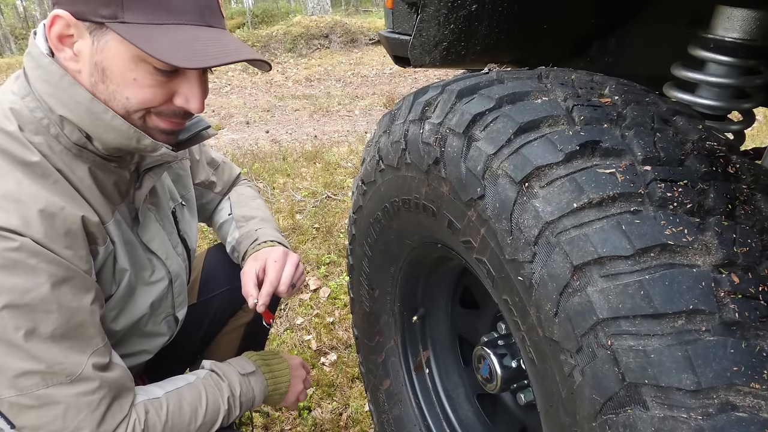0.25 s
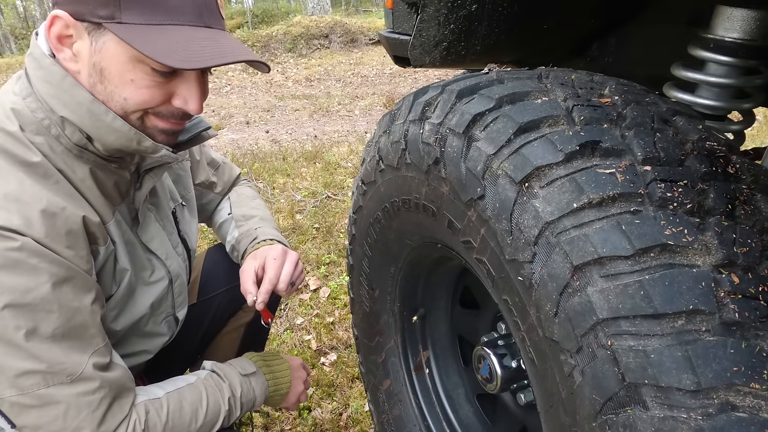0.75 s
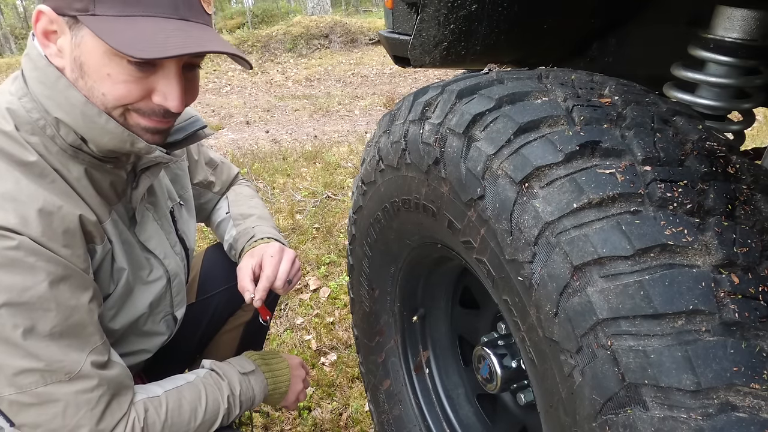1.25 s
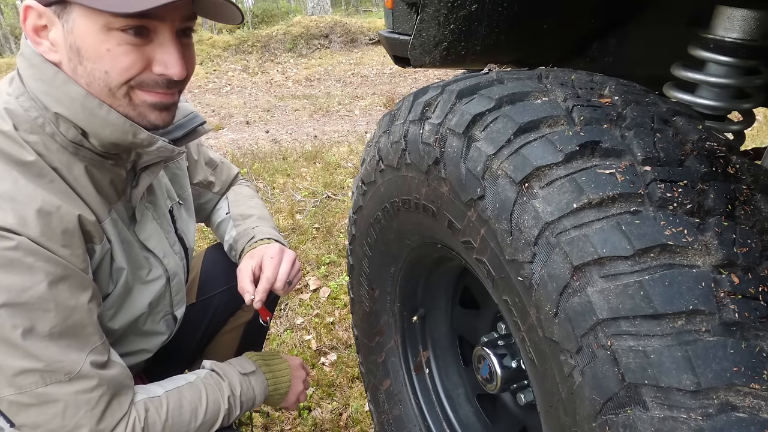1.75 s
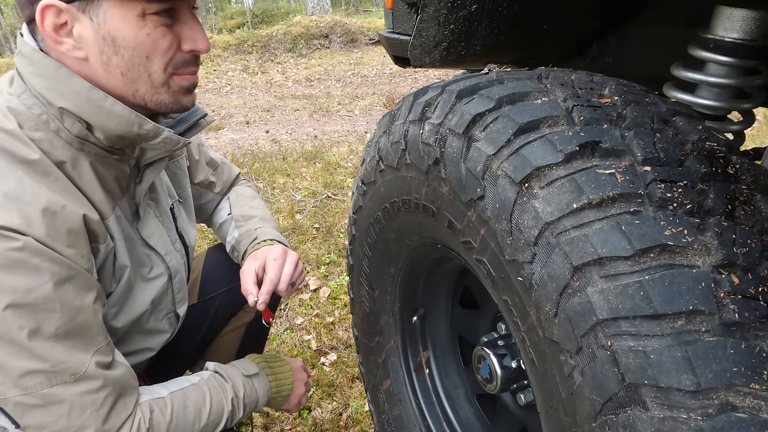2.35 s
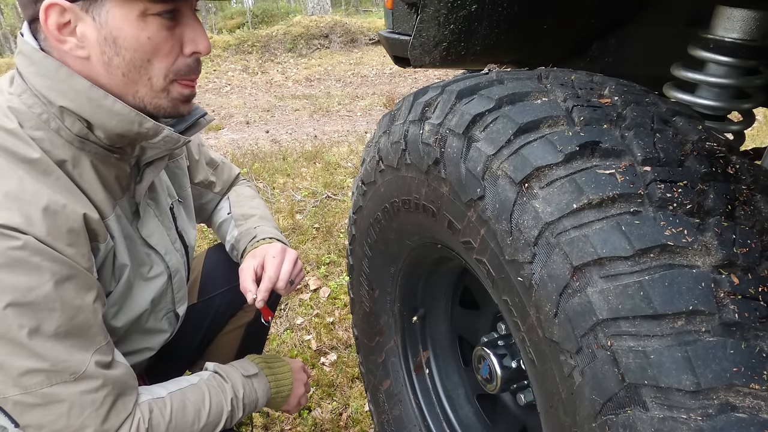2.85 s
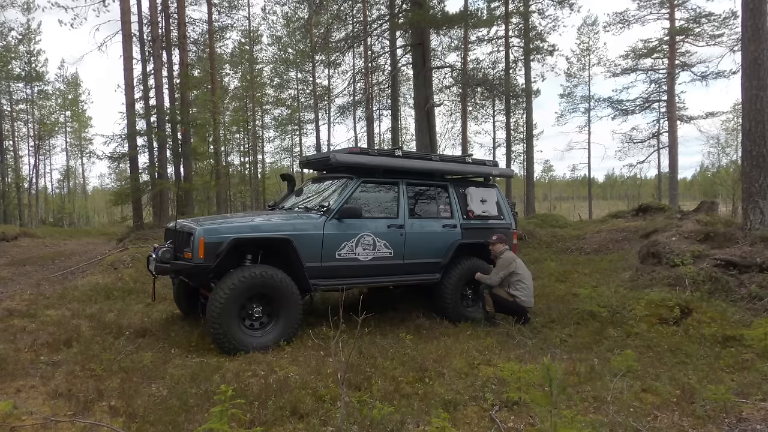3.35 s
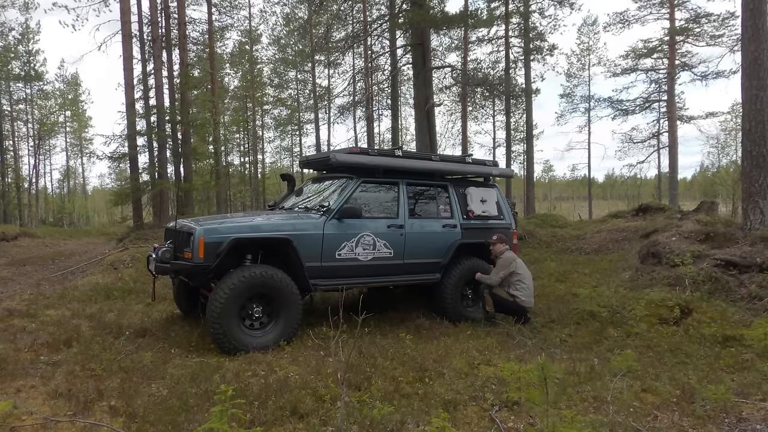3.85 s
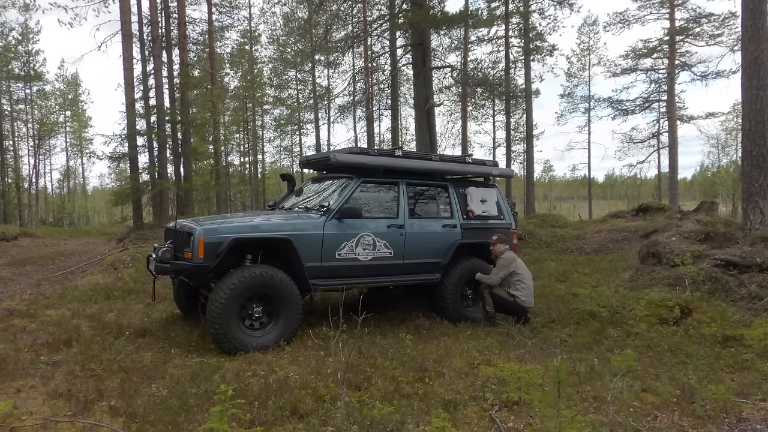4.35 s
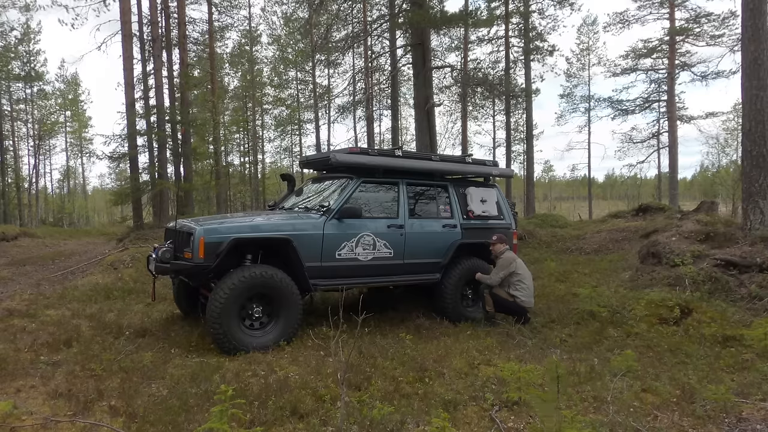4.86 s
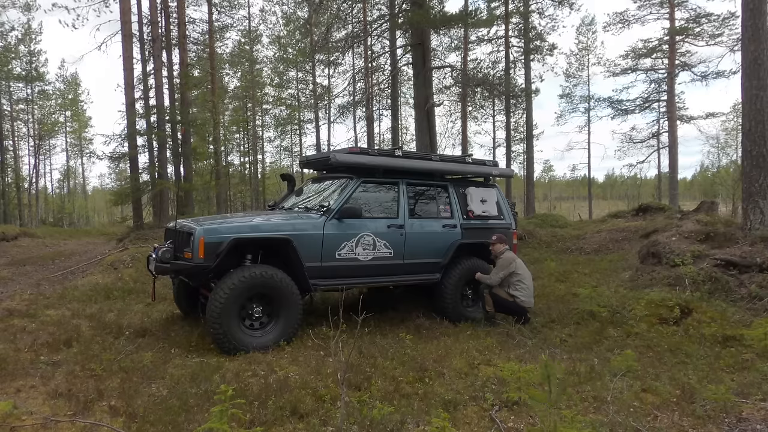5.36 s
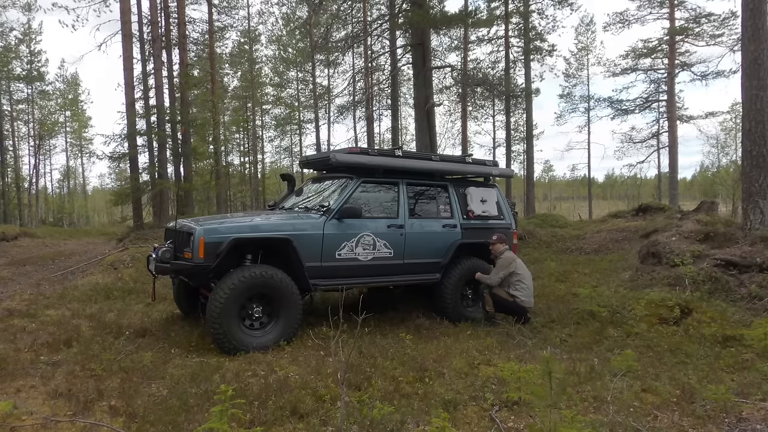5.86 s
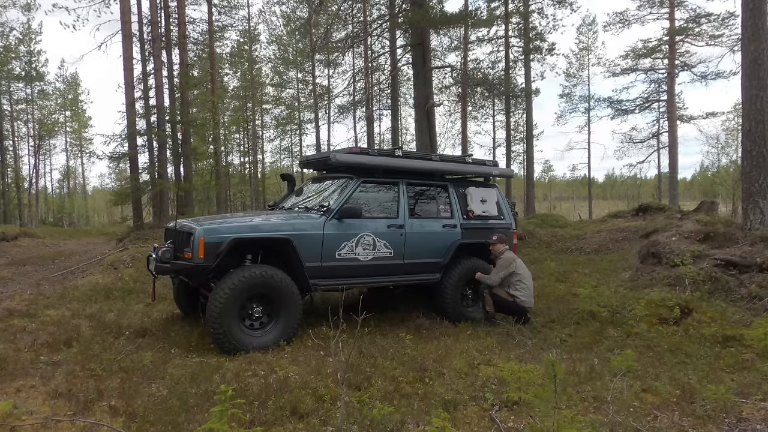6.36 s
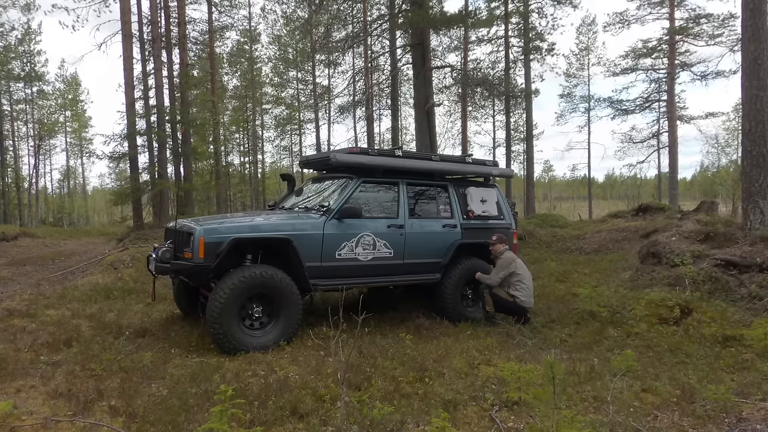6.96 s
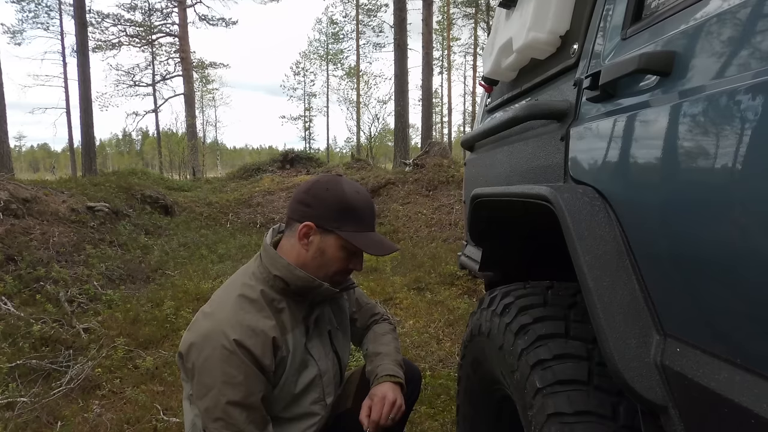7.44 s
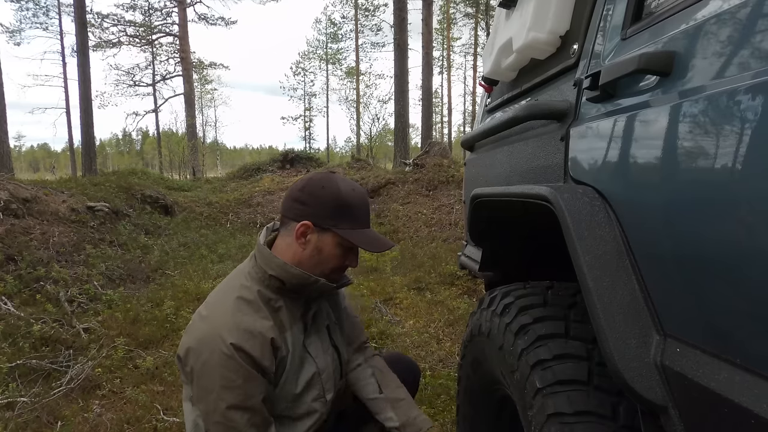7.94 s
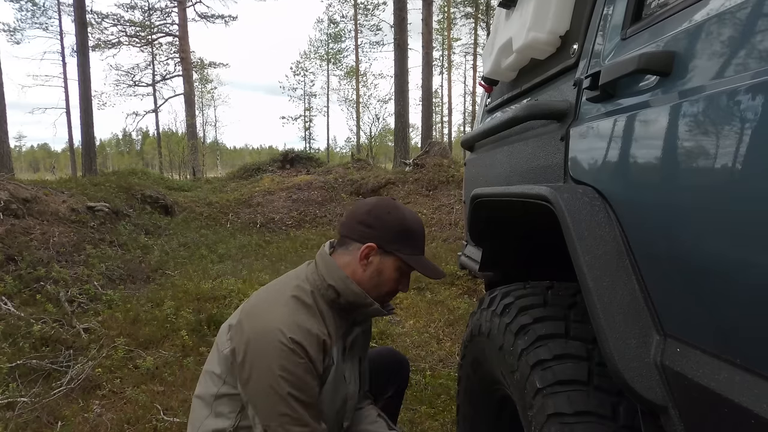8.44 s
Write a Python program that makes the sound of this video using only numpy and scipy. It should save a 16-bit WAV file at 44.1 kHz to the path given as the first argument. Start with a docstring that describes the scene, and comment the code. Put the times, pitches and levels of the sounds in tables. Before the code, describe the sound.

Outdoor, nearly mono sound of a tyre being let down. A crisp unbroken hiss runs throughout, changing colour at two cuts. It is fairly clean at first, then joined by fluttering, rumbling wind against the microphone that slowly eases before coming back stronger. In the last moments the air jet is partly blocked by a hand, and a rushing swish rises in pitch and loudness.

```python
"""Air hisses out of a car tyre's open valve in a forest clearing: noise shaped by resonances and echoes,
heard in turn by the wheel, across the clearing and beside the car. At the end a hand moves into the jet:
a noise band with climbing edges swells into a swish. Wind buffets the microphone, hard at the last two
places, as two bands of noise that shift in pitch and level with its strength. Trees add a faint rush."""
import sys
import numpy as np
from scipy import signal
from scipy.fft import rfft, irfft, next_fast_len
from scipy.io import wavfile
from scipy.ndimage import uniform_filter1d, map_coordinates

SR = 44100
rng = np.random.default_rng(int(sys.argv[2]) if len(sys.argv) > 2 else 0)


def log_audio(samples):
    """Write samples as a 16-bit WAV file to the path given in sys.argv[1]."""
    # one column per channel
    frames = np.atleast_2d(samples).T
    # limit to full scale, then quantise
    limited = np.clip(frames, -1, 1)
    pcm = np.round(limited * 32767).astype(np.int16)
    wavfile.write(sys.argv[1], SR, pcm)


N = 383669
TIME = np.arange(N) / SR
TOP_HZ = 15760
# crossfades between places: start_s, end_s
TO_FAR, TO_SIDE = (2.915, 3.12), (7.17, 7.28)


def amp(db):
    """Decibels to gain."""
    return 10 ** (np.asarray(db) / 20)


def unit(x):
    """Scale to rms 1."""
    return x / np.sqrt(np.mean(x ** 2) + 1e-20)


def along(points, hz):
    """Interpolate (frequency_hz, level_db) points on a log frequency axis."""
    point_hz, level_db = np.transpose(points)
    return np.interp(np.log(hz + 1e-9), np.log(point_hz), level_db)


def wobble(knots_per_s):
    """Smooth random curve through normally distributed knots."""
    knots = rng.standard_normal(int(N * knots_per_s / SR) + 4)
    return map_coordinates(knots, [TIME * knots_per_s])


def swells(rows):
    """Sum of smooth rises and falls in dB, one per (middle_s, length_s, change_db) row."""
    total_db = 0
    for middle_s, length_s, change_db in rows:
        phase = np.pi * np.clip((TIME - middle_s) / length_s, -.5, .5)
        total_db = total_db + change_db * np.cos(phase) ** 2
    return total_db


def below(hz, edge_hz, order):
    """Gain of a low-pass slope."""
    return 1 / np.sqrt(1 + (hz / edge_hz) ** (2 * order))


def filtered(x, response):
    """Apply a frequency response to x by FFT."""
    size = next_fast_len(N + SR // 2)
    spectrum = rfft(x, size) * response(np.fft.rfftfreq(size, 1 / SR))
    return irfft(spectrum, size)[..., :N]


def stereo_noise():
    """White noise in two channels, almost mono: a strong shared mid and a weak side."""
    # stereo width: frequency_hz, side_minus_mid_db
    width = [(60, -9), (240, -22), (950, -24), (3770, -28), (15000, -19.5)]
    mid, side = rng.standard_normal((2, N))
    side = filtered(side, lambda hz: amp(along(width, hz)))
    return np.array([mid + side, mid - side])


def places():
    """Share of the power heard from each place in turn: near, far, side."""
    left_near = np.interp(TIME, TO_FAR, [0, 1])
    reached_side = np.interp(TIME, TO_SIDE, [0, 1])
    return 1 - left_near, left_near * (1 - reached_side), reached_side


def forest():
    """Steady air in the pines: a faint, even rush of shaped noise."""
    # spectrum of the rush: frequency_hz, relative_db
    colour = [(20, 2), (60, -7), (130, -1), (300, 0), (450, -10), (800, -24), (3000, -32), (15000, -50)]
    level_db = -60.5
    return amp(level_db) * unit(filtered(stereo_noise(), lambda hz: amp(along(colour, hz))))


def wind_strength():
    """Wind level in dB: the breeze of each place, gusts and lulls, and a slight unrest."""
    # gusts and lulls: middle_s, length_s, change_db
    gusts = [(.64, .16, 14), (.79, .16, 15), (1.28, .3, 10), (1.75, 0.2, 25), (1.91, 0.29, 26),
             (2.33, .38, 22.5), (2.62, 0.34, 21), (3.55, 0.78, 3.5), (4.52, 0.13, -6), (4.68, 0.27, 4),
             (5.02, .18, 3.5), (5.73, 0.19, 5), (5.87, 0.097, 8), (6.1, .44, -5), (6.31, .18, 6.5),
             (7.1, .34, -3.5), (7.27, .14, 4), (7.4, .12, 5.5), (7.75, .4, 1.5), (8.38, .26, 4.5),
             (8.7, .44, -6.5)]
    near_db, far_db, side_db = -62, -27, -23
    # across the clearing the breeze slowly dies down
    easing_db_per_s = 1.29
    easing_db = easing_db_per_s * np.maximum(TIME - TO_FAR[1], 0)
    breezes_db = near_db, far_db - easing_db, side_db
    breeze = sum(np.sqrt(share) * amp(db) for db, share in zip(breezes_db, places()))
    breeze_db = 20 * np.log10(uniform_filter1d(breeze, size=SR // 20))
    unrest_db = 0.6
    return breeze_db + swells(gusts) + unrest_db * wobble(12)


def eddies(colour, level_db, middling_db, octave_db):
    """Turbulence blown past the microphone: pitch rises with wind at one octave per octave_db."""
    pattern = filtered(rng.standard_normal(N), lambda hz: amp(along(colour, hz)))
    # the pitch follows the wind only within 15 dB of middling
    speed = 2 ** (np.clip(level_db - middling_db, -15, 15) / octave_db)
    pressure = unit(map_coordinates(pattern, [np.cumsum(speed)], order=1, mode="wrap"))
    # even out the noise's own swings, so that level_db sets the level
    local_rms = np.sqrt(np.abs(uniform_filter1d(pressure ** 2, size=SR // 14)) + 1e-6)
    return amp(level_db) * pressure / local_rms


def wind():
    """Eddies buffet the microphone, alike in both channels: large ones rumble, small ones flutter."""
    # large eddies in a middling wind: frequency_hz, relative_db
    rumble = [(10, -16), (25, -8.5), (45, -1), (80, 1), (115, -2.5), (145, -13), (220, -30), (500, -80)]
    # small eddies in a middling wind: frequency_hz, relative_db
    flutter = [(70, -35), (110, -4), (145, 0.5), (200, -5.5), (250, -12), (320, -18.5), (400, -25.5),
               (550, -38), (1200, -66)]
    middling_db, flutter_minus_rumble_db = -27, -6.5
    flutter_db_per_rumble_db = 1.2
    rumble_db = wind_strength()
    middling_flutter_db = middling_db + flutter_minus_rumble_db
    flutter_db = middling_flutter_db + flutter_db_per_rumble_db * (rumble_db - middling_db)
    large = eddies(rumble, rumble_db, middling_db, octave_db=75)
    small = eddies(flutter, flutter_db, middling_flutter_db, octave_db=110)
    # quick buffets on top of the gusts
    buffet_db = 2.5
    return (large + small) * unit(amp(buffet_db * wobble(35)))


def hand_level_db(t):
    """Swish level at times t, as the hand moves into the jet."""
    # swish envelope: time_s, level_db
    hand_level = [(8.15, -55), (8.29, -40.5), (8.37, -34), (8.43, -28), (8.5, -23), (8.61, -19.5),
                  (8.7, -21.5)]
    time_s, level_db = np.transpose(hand_level)
    return np.interp(t, time_s, level_db)


def swish():
    """The jet rushes through the gap under the hand; both band edges climb as the gap narrows."""
    # gap between hand and wheel: frequency_hz, relative_db
    gap = [(300, -9), (1050, -4), (1550, 1), (1900, -1.5), (2250, 2.5), (3000, -3), (4000, -2), (5300, -.5),
           (6400, -3.5), (7300, -.5), (10000, -5), (15000, -2)]
    closing_start_s = 8.312
    start_low_hz, start_high_hz, ceiling_hz = 340, 1550, 6400
    low_octaves_per_s, high_octaves_per_s = 7, 9.6
    hz, t, spectrum = signal.stft(stereo_noise(), SR, nperseg=512)
    hz = hz[:, None] + 1  # keeps the ratio to the low edge finite
    closing_s = np.maximum(t - closing_start_s, 0)
    low_hz = start_low_hz * 2 ** (low_octaves_per_s * closing_s)
    high_hz = np.minimum(start_high_hz * 2 ** (high_octaves_per_s * closing_s), ceiling_hz)
    # swapped arguments make the first slope a high-pass
    band = below(low_hz, hz, order=2) * below(hz, high_hz, order=3)
    colour = amp(along(gap, hz)) * band
    colour = colour / np.sqrt(np.mean(colour ** 2, axis=0))
    rush = signal.istft(spectrum * colour * amp(hand_level_db(t)), SR, nperseg=512)[1][:, :N]
    flutter_db = 1.3
    return rush * amp(flutter_db * wobble(70))


def jet(level_db, colour, peaks, echoes, flutter_db):
    """Turbulence at the valve, coloured by the cavities and surfaces on its way to one place."""
    # a crouching body leans into the path or out of it: middle_s, length_s, treble_change_db
    shades = [(3.32, 0.32, -0.2), (4.58, .3, -.6), (5.72, 0.62, 1.2), (6.2, 0.29, -2.2), (6.7, 0.57, -2),
              (7.04, 0.29, -0.9), (8.2, 0.64, 1)]

    def path(hz):
        """Response of the path: broad colour, resonances and notches, echo comb, band limit."""
        cavities_db = sum(gain_db / (1 + (2 * (hz - centre_hz) / width_hz) ** 2)
                          for centre_hz, width_hz, gain_db in peaks)
        comb = 1 + sum(gain * np.exp(-2j * np.pi * hz * delay_s) for delay_s, gain in echoes)
        return amp(along(colour, hz) + cavities_db) * comb * (hz < TOP_HZ)

    hiss = unit(filtered(stereo_noise(), path))
    # short waves beam, so only they are shaded
    treble = filtered(hiss, lambda hz: 1 - below(hz, edge_hz=3400, order=4))
    shaded = hiss - treble + amp(swells(shades)) * treble
    # moving air makes the level flutter slightly
    return amp(level_db + flutter_db * wobble(25)) * shaded


def valve():
    """One leak, crossfaded from place to place at constant power; the hand takes air from the jet."""
    # broad colour of the jet at each place: frequency_hz, relative_db
    near_jet = [(60, -24.1), (250, -21.1), (500, -17.1), (800, -12.7), (1200, -7.2), (2200, -6.2),
                (4000, -0.1), (6000, -4.5), (9000, 0.0), (12000, -1.8), (15500, -3.4)]
    far_jet = [(60, -17.5), (250, -14.5), (500, -10.5), (800, -8.3), (1200, -4.4), (2200, -3.8),
               (4000, 0.0), (6000, -0.5), (9000, -1.6), (12000, -2.7), (15500, -3.5)]
    side_jet = [(60, -16.3), (250, -13.3), (500, -9.3), (800, -9.9), (1200, -8.6), (2200, -5.0),
                (4000, -1.1), (6000, 0.0), (9000, -2.1), (12000, -5.4), (15500, -6.4)]
    # resonances and notches of valve, rim and wheel arch: centre_hz, width_hz, gain_db
    near_peaks = [(2176, 336, 4.2), (3353, 198, 1.9), (4093, 524, 2.2), (5006, 416, 3.7), (5901, 263, 5.7),
                  (6844, 147, 4.4), (7536, 186, 2.5), (8169, 271, 3.1), (8632, 115, 2.7), (9219, 680, 2.7),
                  (9820, 234, 3.3), (10699, 243, 2.0), (11733, 668, 2.9), (12953, 190, 5.9),
                  (13236, 259, -3.2), (14052, 534, 3.4)]
    far_peaks = [(791, 132, 2.7), (1100, 176, 3.8), (1332, 444, -2.9), (1831, 277, 4.0), (2387, 176, 4.7),
                 (3552, 244, 4.4), (3941, 334, 4.9), (4270, 191, 2.9), (4746, 185, 1.9), (6154, 120, 1.8),
                 (7536, 114, 2.2), (8248, 144, 4.6), (8717, 100, 3.1), (9118, 176, 6.2), (10165, 119, -2.8),
                 (10727, 104, 2.8), (10936, 171, -4.2), (11338, 716, 1.6), (13124, 117, 3.9),
                 (13693, 128, -2.5)]
    side_peaks = [(2116, 257, 3.6), (2503, 105, 3.0), (3092, 800, -2.0), (4148, 769, 2.6),
                  (4516, 229, -3.1), (4931, 314, 3.8), (5977, 649, 2.3), (6662, 163, 2.3),
                  (7216, 378, -5.0), (7681, 512, 5.0), (8647, 800, 3.9), (10373, 458, -6.5),
                  (11429, 800, 7.8), (12217, 568, 6.9), (12654, 239, 5.0)]
    # reflections off wheel and car body: delay_s, gain (linear)
    near_echoes = [(0.001279, 0.076), (0.00158, 0.068)]
    far_echoes = [(0.000704, 0.066), (0.001136, -0.11), (0.00267, -0.05), (0.002995, 0.052)]
    near = jet(-21.5, near_jet, near_peaks, near_echoes, flutter_db=0.3)
    far = jet(-24, far_jet, far_peaks, far_echoes, flutter_db=0.3)
    side = jet(-22.1, side_jet, side_peaks, [], flutter_db=0.35)
    # the more air the hand deflects, the less is left in the free jet
    deflection_db = np.interp(hand_level_db(TIME), [-31, -21], [0, -3.5])
    side = side * amp(deflection_db)
    return sum(hiss * np.sqrt(share) for hiss, share in zip((near, far, side), places()))


def scene():
    """Hiss, swish and wind over the quiet of the forest."""
    return valve() + swish() + wind() + forest()


def record(dry):
    """Band limit: removes everything from TOP_HZ up."""
    return filtered(dry, lambda hz: hz < TOP_HZ)


dry = scene()
out = record(dry)
log_audio(out)
```